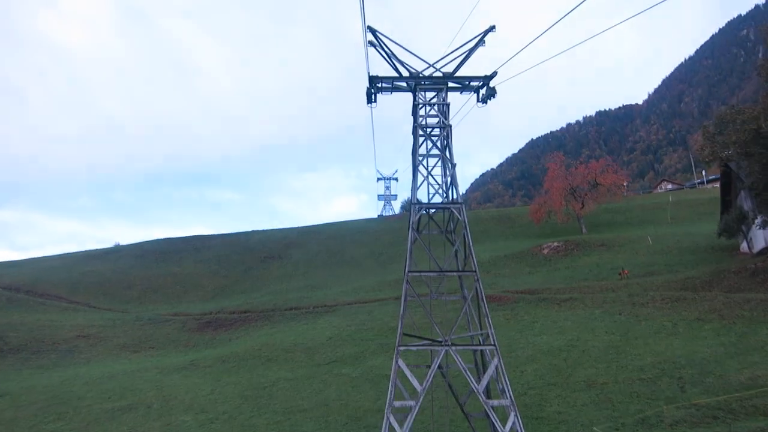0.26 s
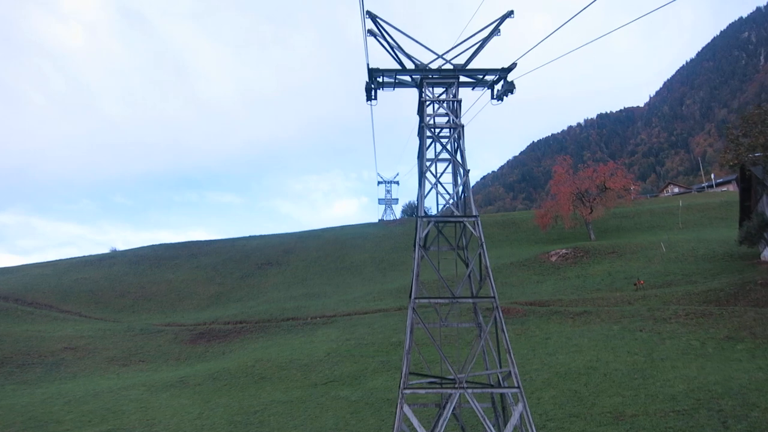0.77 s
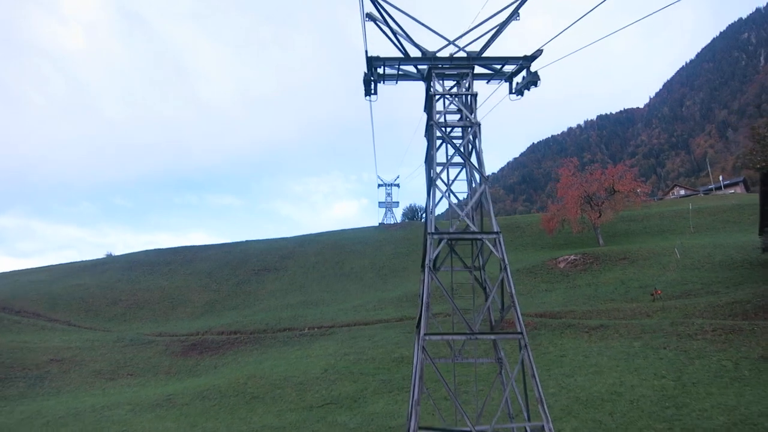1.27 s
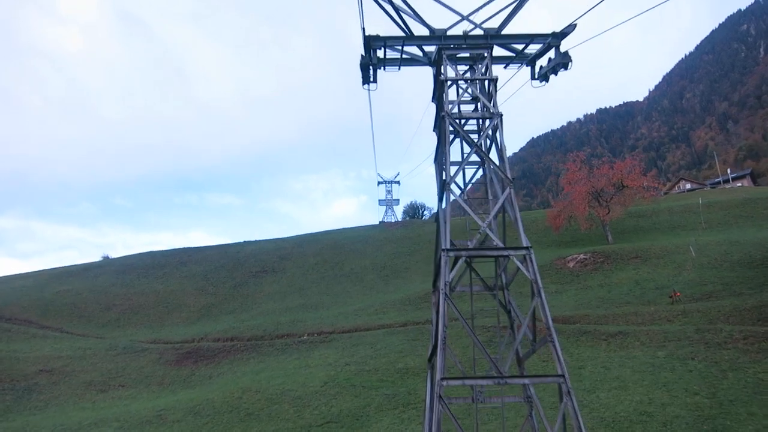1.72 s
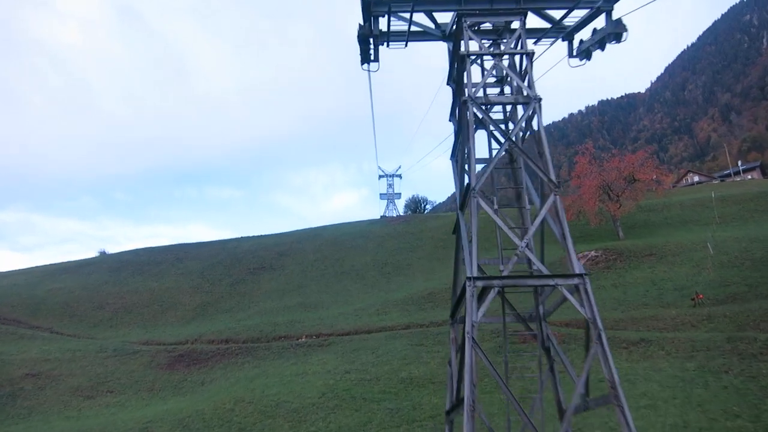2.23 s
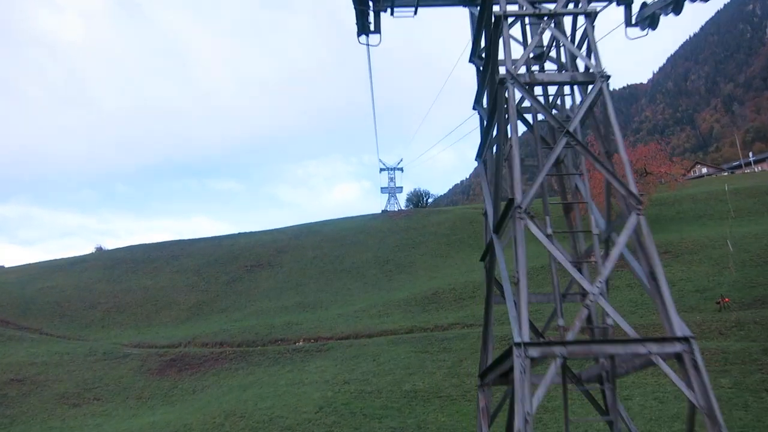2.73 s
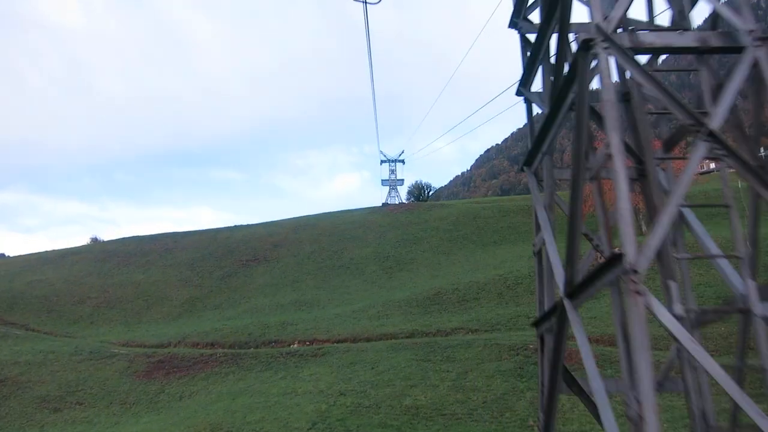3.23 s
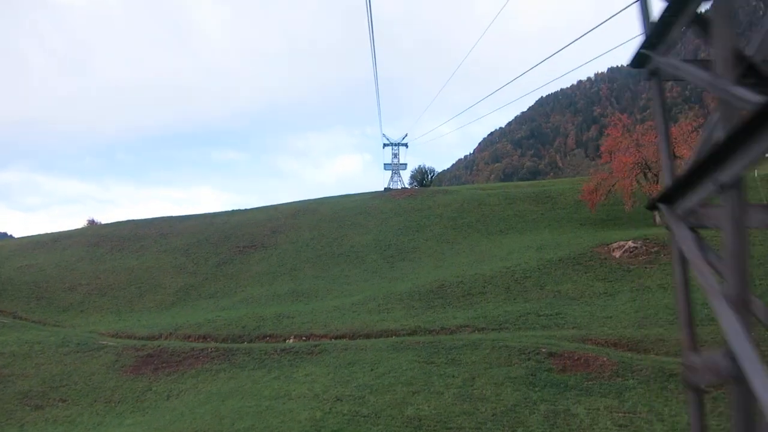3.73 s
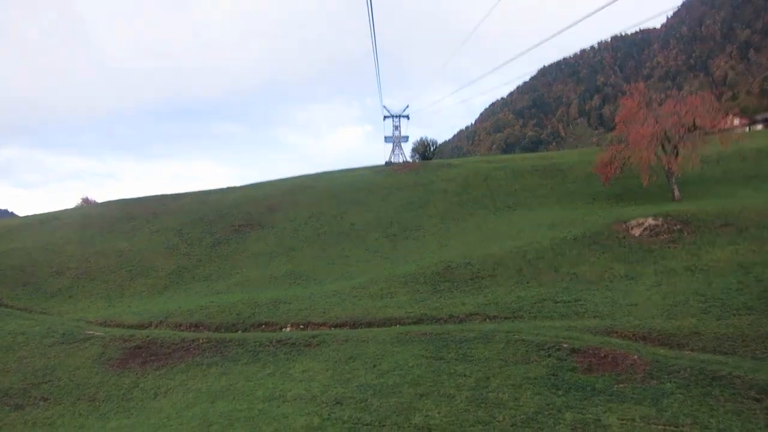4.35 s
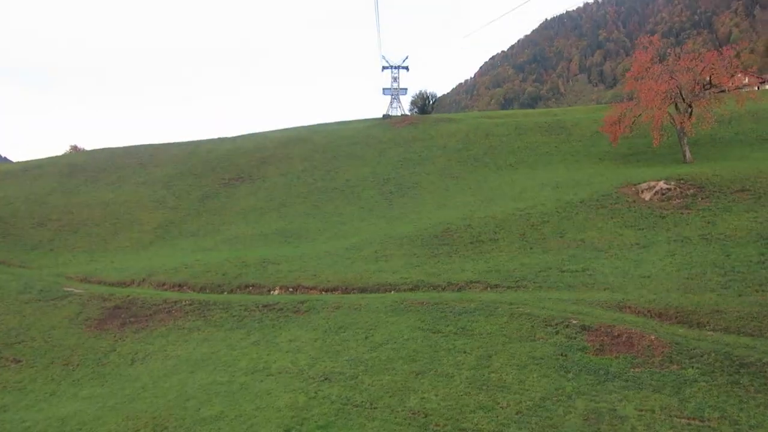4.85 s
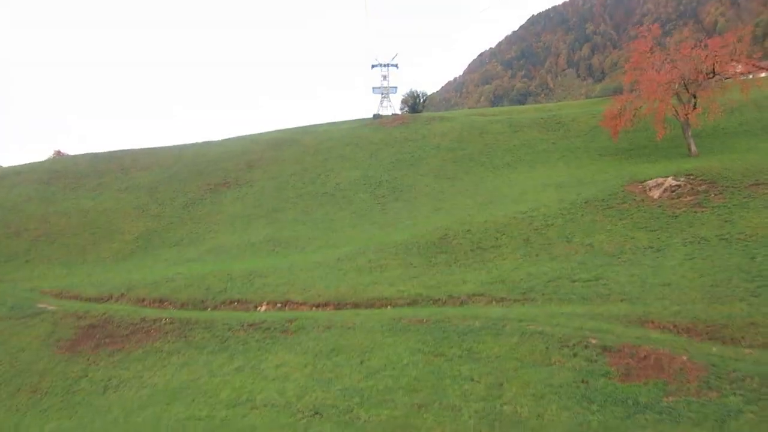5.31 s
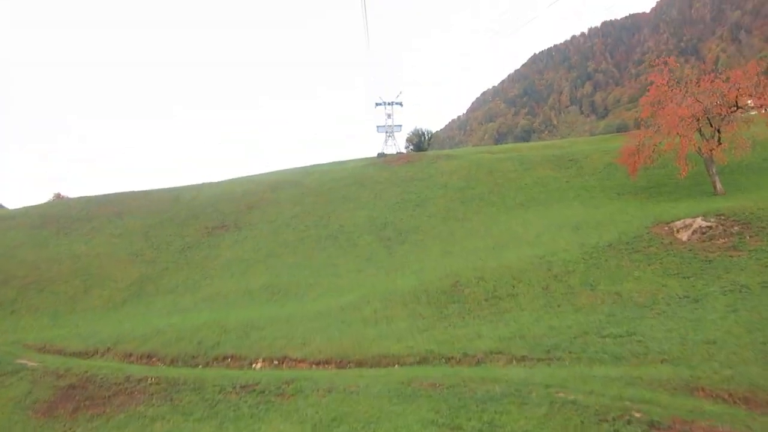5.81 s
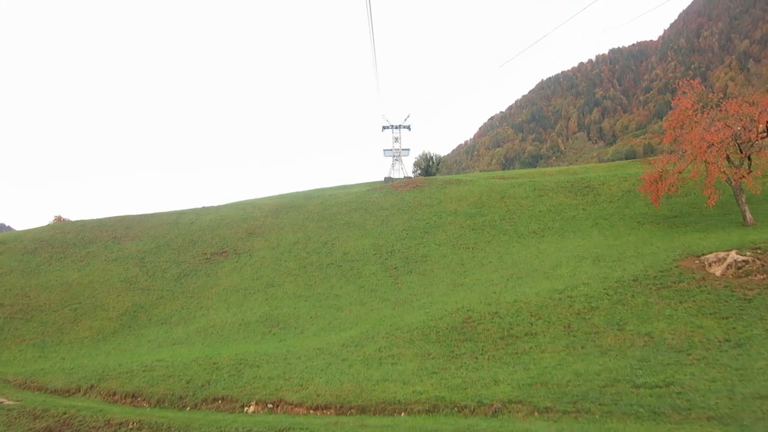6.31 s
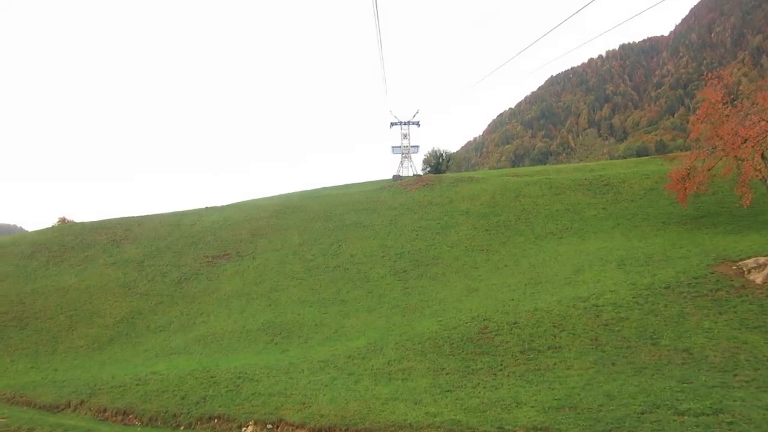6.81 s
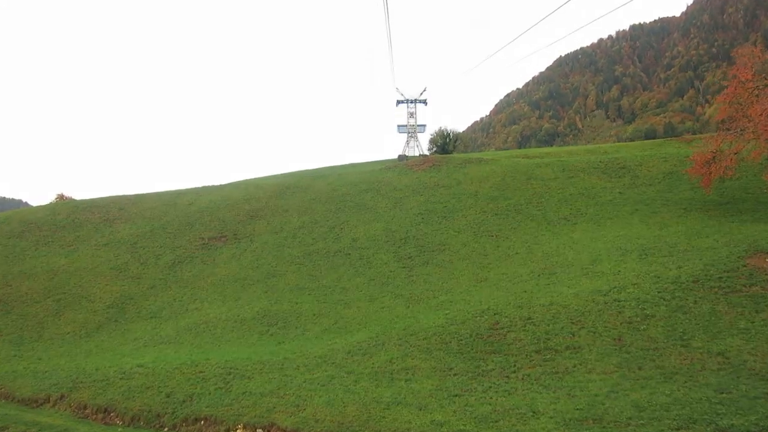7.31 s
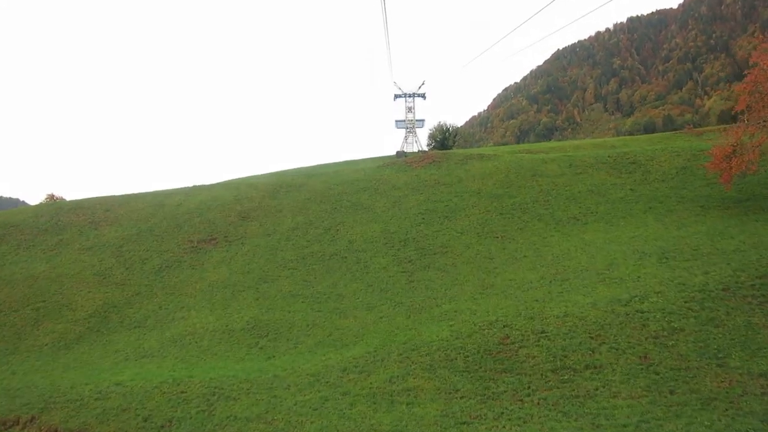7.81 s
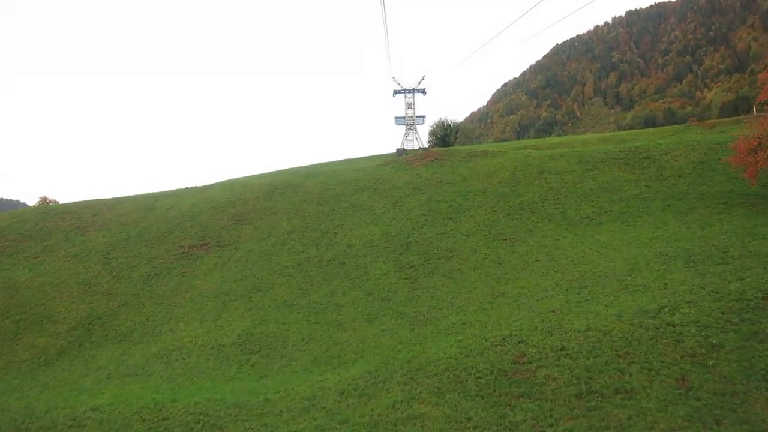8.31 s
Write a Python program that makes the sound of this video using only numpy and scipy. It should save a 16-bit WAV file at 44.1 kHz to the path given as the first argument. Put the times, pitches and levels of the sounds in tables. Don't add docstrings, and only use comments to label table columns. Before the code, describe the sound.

Close stereo sound inside an old aerial cabin: low throbbing rumble from wheels on a rope above, buzzing sheets and panes, bright little rattles. Midway, clustered dull steel clanks and scrapes mark the tower, with barely audible high roller squeaks. The rumble briefly thins before swelling back steadier and less rattly. A few dry plastic snaps jump out very near, and thin air hisses through window gaps.

```python
import sys
import numpy as np
from scipy import signal
from scipy.fft import rfft, irfft, next_fast_len
from scipy.io import wavfile
from scipy.ndimage import uniform_filter1d, map_coordinates

SR = 44100
rng = np.random.default_rng(int(sys.argv[2]) if len(sys.argv) > 2 else 0)


def to_wav(s):
    ch = np.atleast_2d(s).T
    pcm = np.round(np.clip(ch, -1, 1) * 32767)
    wavfile.write(sys.argv[1], SR, pcm.astype(np.int16))


def nominal_scale(level):
    x = np.asarray(level, float) / 20
    return 10 ** x


N = 377937


def rolling():
    phase, load_db, drone_db, jolt_db = wheel_drive()
    extra_db = jolt_db + 46
    return (drone(phase, drone_db) + hull(load_db, drone_db, extra_db) + door(extra_db)
            + rumble(drone_db) + panels(phase, jolt_db) + fittings(phase, load_db, extra_db))


# start_s, strand_rate_hz
ROPE_STRANDS = [(0, 46.86), (4.2, 46.53), (4.7, 44.65), (5.4, 46.65), (6.2, 48.06), (7.2, 48.22),
                (7.6, 46.02), (8.57, 46.8)]
# start_s, level_db
ROPE_LOAD = [(0, 0.5), (2.6, -2.5), (4.3, 0), (4.45, -2.5), (5.2, -7), (5.6, -3), (6.3, -1.5), (7.3, -1.5),
             (8.57, -1.5)]
# peak_s, level_db, rise_s, fall_s
DRONE_SWELLS = [(0.12, -13, 0.1, 0.075), (0.31, -14.5, 0.11, 0.069), (0.483, -10.5, 0.05, 0.13),
                (0.93, -14, 0.19, 0.13), (1.126, -17.5, 0.14, 0.032), (1.287, -11.5, 0.097, 0.15),
                (1.691, -12.5, 0.12, 0.11), (2.076, -11.5, 0.12, 0.12), (2.489, -11.5, 0.13, 0.11),
                (2.91, -10.5, 0.11, 0.081), (3.299, -11.5, 0.13, 0.095), (3.614, -13, 0.029, 0.12),
                (4.029, -18.5, 0.044, 0.273), (4.215, -13, 0.068, 0.062), (4.586, -30, 0.02, 0.2),
                (4.77, -23, 0.02, 0.17), (5.089, -20, 0.1, 0.066), (5.307, -20, 0.126, 0.6),
                (5.715, -14.5, 0.089, 0.11), (6.06, -18.5, 0.11, 0.094), (6.204, -15, 0.21, 0.048),
                (6.384, -11.5, 0.029, 0.12), (6.839, -18, 0.25, 0.048), (6.978, -16, 0.1, 0.057),
                (7.171, -14.5, 0.072, 0.099), (7.493, -14, 0.16, 0.085), (7.794, -14, 0.16, 0.033),
                (7.905, -11.5, 0.091, 0.042), (8.188, -12, 0.13, 0.17), (8.509, -12, 0.072, 0.37)]
# peak_s, level_db, rise_s, fall_s
CABIN_JOLTS = [(.15, -40, 0.093, 0.047), (.299, -48, 0.43, .35), (.503, -40, 0.026, 0.066),
               (.95, -37, 0.096, 0.08), (1.33, -37, 0.11, 0.077), (1.746, -39, 0.11, 0.069),
               (2.139, -36.5, 0.12, 0.073), (2.535, -35.5, 0.11, 0.077), (2.919, -35, 0.082, 0.079),
               (3.337, -36.5, 0.12, 0.086), (3.642, -38.5, 0.04, 0.097), (3.765, -38.5, 0.063, 0.029),
               (4.05, -43.5, 0.12, 0.14), (4.215, -31, 0.08, 0.088), (4.3, -39, 0.062, 0.055),
               (.6, -43, 0.032, 0.035), (1.1, -55, 0.036, 0.11), (1.53, -48.5, 0.023, 0.04),
               (5.27, -46.5, 0.18, 0.17), (5.776, -41.5, 0.17, 0.061), (6.134, -46.5, 0.15, 0.087),
               (6.41, -44.5, 0.065, 0.16), (6.855, -47.5, 0.17, 0.017), (7.207, -47.5, 0.23, 0.019),
               (7.492, -43.5, 0.075, 0.096), (7.674, -43.5, 0.062, 0.047), (7.898, -42.5, 0.12, 0.088),
               (8.198, -42, 0.15, 0.3), (8.535, -40, 0.032, .17)]


def wheel_drive():
    (strand_hz,), (load_db,) = curves(ROPE_STRANDS), curves(ROPE_LOAD)
    drone_db = bumps(DRONE_SWELLS, -32.5)
    jolt_db = bumps(CABIN_JOLTS, -50 + load_db, order=1.5)
    phase = 2 * np.pi * np.cumsum(strand_hz) / SR + 0.039 * wobble(6.0)
    return phase, load_db, drone_db, jolt_db


def drone(phase, drone_db):
    force = np.sqrt(2) * nominal_scale(drone_db + 1.15 * wobble(45))
    octave = 0.32 * force ** 2 * nominal_scale(2.3 * wobble(27)) * np.cos(2 * phase + 0.23)
    return (force * np.sin(phase) + octave) * nominal_scale([[1.2], [-1.2]])


# centre_hz, width_hz, level_db
HULL_MODES = [(95.5, 15, 2), (115.3, 9.5, 1.5), (122.8, 8.3, 2.5), (157.5, 11.7, -6), (187.5, 20.5, -6),
              (245.8, 13.1, -0.5), (273.8, 15.7, -6)]
# frequency_hz, level_db_per_hz
HULL_FLOOR_COLOUR = [(15, -33), (25, -3), (54, 13), (70, -19.5), (288, -56), (325, -20), (355, -20.5),
                     (591, -40), (900, -62), (1170, -74), (1980, -120)]
# peak_s, level_db, half_width_s
ROOF_BEAM_KICKS = [(0.08, -21.5, 0.074), (0.26, -28, 0.032), (0.52, -18.5, 0.044), (0.654, -24, 0.035),
                   (0.91, -23.5, 0.081), (1.25, -20.5, 0.15), (1.55, -21.5, 0.04), (1.81, -21.5, 0.095),
                   (1.93, -20, 0.042), (2.09, -18.5, 0.04), (2.25, -21, 0.05), (2.43, -27, 0.04),
                   (2.54, -20, 0.078), (2.68, -23, 0.04), (2.81, -27, 0.036), (3.1, -18.5, 0.09),
                   (3.28, -22, 0.08), (3.47, -22.5, 0.063), (3.64, -22, 0.082), (3.89, -22, 0.056),
                   (3.99, -19, 0.036), (4.22, -21, 0.07), (4.44, -33, 0.031), (4.53, -30, 0.027),
                   (4.69, -26, 0.046), (4.86, -27.5, 0.077), (5.01, -33, 0.032), (5.26, -25, 0.11),
                   (5.79, -21.5, 0.032), (5.92, -24.5, 0.031), (6.04, -21, 0.077), (6.35, -18, 0.051),
                   (6.43, -20, 0.075), (6.56, -23.5, 0.048), (6.72, -27, 0.048), (6.89, -22, 0.074),
                   (7.19, -20.5, 0.12), (7.4, -26, 0.036), (7.5, -17.5, 0.04), (7.66, -17, 0.06),
                   (7.87, -19.5, 0.06), (8.11, -17, 0.095), (8.53, -25, 0.031)]
# peak_s, level_db, half_width_s
FLOOR_SHEET_KICKS = [(.14, -20, 0.066), (.34, -22.5, 0.021), (.49, -25, 0.053), (.68, -26.5, 0.031),
                     (.93, -24, 0.17), (1.3, -22, 0.12), (1.54, -25, 0.018), (1.709, -23, 0.095),
                     (2.1, -24.5, 0.16), (2.23, -26, 0.027), (2.52, -23, 0.13), (2.92, -22.5, 0.13),
                     (3.3, -23.5, 0.14), (3.66, -25.5, 0.042), (3.78, -22.5, 0.081), (4.07, -27, 0.13),
                     (4.22, -21, 0.11), (4.62, -34, .05), (4.9, -31, 0.032), (5.3, -31.5, 0.084),
                     (5.68, -28, 0.048), (5.8, -26, 0.078), (6.19, -27, 0.09), (6.4, -22, 0.042),
                     (6.7, -27, 0.041), (6.88, -29, 0.038), (7.15, -24.5, 0.11), (7.5, -22, 0.14),
                     (7.71, -23, 0.13), (7.92, -27, 0.12), (8.2, -19.5, 0.088), (8.5, -26, 0.097)]


def hull(load_db, drone_db, extra_db):
    beam_hz, floor_hz = 105.9, 140

    def body(f):
        select = 1 / (1 + (f / 340) ** 4)
        return select * np.abs(modes(HULL_MODES, f)) + nominal_scale(along(HULL_FLOOR_COLOUR, f) - 11.5) * (f > 55)

    shell = steady(pair(lambda f: body(f) * (f < beam_hz)), 0.28, 0.045)
    beam = steady(pair(lambda f: body(f) * (f >= beam_hz) * (f < floor_hz)), 0.51, 0.04)
    floor = steady(pair(lambda f: body(f) * (f >= floor_hz)), 0.81, 0.049)
    shell_db = -18.5 + 0.17 * extra_db + 0.13 * (drone_db + 17) + 0.88 * load_db
    beam_db = bumps([(s, db, w, w) for s, db, w in ROOF_BEAM_KICKS], -28 + load_db)
    floor_db = bumps([(s, db, w, w) for s, db, w in FLOOR_SHEET_KICKS], -27.5 + 1.07 * load_db)
    return nominal_scale(shell_db - 4.5) * shell + nominal_scale(beam_db - 0.5) * beam + nominal_scale(floor_db) * floor


# peak_s, level_db
DOOR_HUMS = [(.15, -29), (.94, -31), (2.14, -25), (2.55, -22.5), (2.93, -23), (3.34, -26), (3.74, -30.5),
             (4.22, -23.5), (5.73, -32), (6.12, -29.5), (7.5, -34), (8.2, -44)]


def door(extra_db):
    rise_s, fall_s = 0.042, 0.067
    hum = steady(pair(lambda f: modes([(323.5, 18.2, 0)], f) ** 2), 0.71, 0.023)
    door_db = bumps([(s, db, rise_s, fall_s) for s, db in DOOR_HUMS], -38.5 + 0.58 * extra_db)
    return nominal_scale(door_db - 3.0) * hum


def rumble(drone_db):
    colour = [(20, -34), (33, -17), (60, -10.0), (80, -43)]  # frequency_hz, level_db_per_hz
    return nominal_scale(drone_db - 12.5) * pair(lambda f: nominal_scale(along(colour, f)) * (f < 90))


# centre_hz, width_hz, lift_db
PANEL_MODES = [(512, 25, 4.5), (677, 23, 3.5), (752, 103, -9), (730, 11, 6.5), (785, 14, 2.5),
               (1693, 25, 2), (2160, 16, -3), (905, 8.2, 9), (1085, 20, 5), (1198, 31, 5), (1553, 88, 4.5),
               (2068, 13, 8.5), (2763, 40, 6)]
# frequency_hz, level_db_per_hz
PANEL_NOISE = [(300, -3), (400, -4), (560, -8.5), (750, -4), (1220, -11), (1400, -15.5), (1600, -15.5),
               (2000, -20), (2500, -25), (2900, -28.5), (3300, -36), (4200, -37.5), (6000, -94)]


def panels(phase, jolt_db):
    def colour(f):
        lift_db = sum(db / (1 + ((f - c) / w * 2) ** 2) for c, w, db in PANEL_MODES)
        return nominal_scale(along(PANEL_NOISE, f) + lift_db)

    thin = lambda f: 1 / (1 + (950 / (f + 1)) ** 6)
    panel_db = jolt_db + 5.5 + 0.86
    uneven = nominal_scale(2.2 * wobble(25) + 1.7 * wobble(300))
    sheets = pair(lambda f: colour(f) * (1 - thin(f)), nominal_scale(0.54 * wobble(25)))
    panes = pair(lambda f: colour(f) * thin(f), uneven * contact(phase, 0.05, 8.5))
    sheets, panes = steady(sheets, 0.45, 0.046), steady(panes, 0.34, 0.028)
    return nominal_scale(0.65 * panel_db - 9.0) * sheets + nominal_scale(1.1636 * panel_db + 2.5) * panes


# frequency_hz, level_db_per_hz
FITTING_HISS = [(2400, -19), (3200, 1), (3900, -6.5), (4650, -1), (5500, -4), (6000, -2.5), (7200, -3.5),
                (7700, -6), (8300, -2.5), (9600, -12), (11000, -8), (11900, -11), (13000, -15),
                (15700, -29)]


def fittings(phase, load_db, extra_db):
    chatter = nominal_scale(2.3 * wobble(35) + 1.6 * wobble(600)) * contact(phase, 0.11, -1.5)
    fitting_db = -56.5 + 0.91 * extra_db + 0.77 * load_db
    return nominal_scale(fitting_db - 2.0) * pair(lambda f: nominal_scale(along(FITTING_HISS, f)), chatter)


def contact(phase, depth, lag):
    return np.exp(depth * np.cos(phase + lag))


# start_s, level_db, scrape_db
SHOE_BLOWS = [(3.722, -21, -1), (3.745, -28, -7), (3.815, -27.5, 3), (3.879, -30, 5.5), (3.968, -34, 8),
              (4.101, -6, -14), (4.192, -11, -14), (4.208, -13, -8), (4.254, -25, -5.5), (4.228, -34, -6),
              (4.402, -34.5, 7.5), (4.426, -33, -1), (4.534, -14, -17.5), (4.609, -12, -15),
              (4.823, -12, -20), (5.194, -6.5, -18), (5.283, -38, -2)]
# pitch_hz, level_db, t60_s
HANGER_MODES = [(682, -9, 0.15), (722, -2, .09), (791, 0, 0.085), (868, -6, .06), (409, -16, .2),
                (1010, -19, .2), (1095, -14, .09), (735, 0, 0.1), (890, -7, 0.3), (395, -14, .2),
                (1104, -16, .25)]
# start_s, level_db
ARM_SLIDES = [
    (3.893, -22.5),
    (3.985, -24),
    (4.664, -23),
    (4.685, -20.5),
]
# pitch_hz, level_db, t60_s
GRAZED_MODES = [(678, 0, .14), (1010, -9, .1), (409, -12, .2), (1346, -15, .1)]
# centre_hz, width_hz, level_db
SCRAPE_MODES = [(734, 185, 9), (1156, 70, 4), (1450, 570, -3.5), (1960, 550, 1), (2190, 610, -2.5)]
# start_s, pitch_hz, level_db, t60_s
WHEEL_THUDS = [(3.634, 170, 5, .04), (3.3, 270, -12, 0.066), (3.63, 680, -20, .06), (3.722, 510, -17, 0.11),
               (4.207, 258, -1, 0.069), (3.79, 434, -21.5, 0.084), (3.99, 273, -9, 0.063)]


def clanks():
    out, scrape, t = np.zeros(N), np.zeros(N), np.arange(SR // 3) / SR
    rise = (1 - np.exp(-t / 0.0032)) ** 2
    rebound_s = .014

    def partial(hz, db, t60):
        blur = np.cumsum(rng.normal(0, .019, len(t)))
        return nominal_scale(db - 60 * t / t60) * np.sin(2 * np.pi * hz * t + blur)

    ring = lambda table: rise * sum(partial(*row) for row in table)
    for s, db, scrape_db in SHOE_BLOWS:
        select = 4 < s < 4.15 or 4.2 < s < 4.3
        struck = HANGER_MODES[7:] if select else HANGER_MODES[:7]
        add(out, s - .005, nominal_scale(db - 6.0) * ring(struck))
        add(out, s - .005 + rebound_s, nominal_scale(db - 10.0) * ring(struck))
        add(scrape, s - .004, nominal_scale(db + scrape_db) * rise * nominal_scale(-60 * t / 0.15))
    for s, db in ARM_SLIDES:
        add(out, s - .005, nominal_scale(db) * ring(GRAZED_MODES))
    for s, hz, db, t60 in WHEEL_THUDS:
        add(out, s, ring([(hz, db, t60)]))
    out += scrape * unit(filtered(rng.standard_normal(N), lambda f: modes(SCRAPE_MODES, f)))
    return filtered(out, lambda f: 1 / (1 + (f / 2700) ** 8))


# start_s, level_db, push_hz, tick_db
PLASTIC_CRACKS = [(2.3556, -12.5, 1480, -38), (3.0426, -16, 1350, -33), (5.132, -17, 1200, -30),
                  (5.145, -15.5, 906, -35), (5.166, -18, 1593, -21), (5.184, -21, 900, -21),
                  (6.4591, -5.5, 1510, -11.5), (6.524, -13, 1450, -18), (6.5663, -9, 1420, -12.5),
                  (6.934, -30, 1100, -32)]
# frequency_hz, level_db_per_hz
TICK_COLOUR = [(1500, -7), (2500, -13), (4800, -2), (6800, -5), (9000, 0), (13000, -6), (15800, -29)]
# centre_hz, width_hz
HOUSING_DIPS = [(3300, 540), (4900, 600), (7400, 500)]
# start_s, pitch_hz, level_db
STEEL_PINGS = [(3.4822, 11500, -31), (5.147, 11500, -50), (5.185, 12800, -42), (5.199, 12200, -52),
               (5.204, 12860, -47), (5.2215, 11200, -43), (5.2835, 10700, -54)]


def snaps():
    out, t = np.zeros((2, N)), np.arange(SR // 30) / SR
    lean = nominal_scale([[1.8], [-1.8]])
    late = np.maximum(t - np.array([[0], [.0001]]), 0)
    soften = lambda f: 1 / (1 - (f / 2200) ** 2 + .9j * f / 2200) ** 2
    edge = nominal_scale(-60 * t / 0.00045) * np.array([[1.3], [.4]])
    edge = edge + nominal_scale(-60 * t / 0.003) * np.sin(2 * np.pi * 7000 * t) * np.array([[.22], [.5]])
    body = 0.1 * np.sin(2 * np.pi * 620 * t) * nominal_scale(-60 * t / 0.0055)
    for s, db, push_hz, tick_db in PLASTIC_CRACKS:
        hiss = rng.standard_normal((2, len(t)))
        push = 1.08 * filtered(np.sin(2 * np.pi * push_hz * late) * nominal_scale(-60 * late / 0.0017), soften)
        bright = unit(filtered(hiss[0] + 0.23 * hiss, lambda f: nominal_scale(along(TICK_COLOUR, f))))
        tick = nominal_scale(tick_db) * bright * (nominal_scale(-60 * t / 0.0054) + 0.1 * nominal_scale(-60 * t / 0.051))
        dull = uniform_filter1d(uniform_filter1d(hiss[0], size=11), size=7)
        shiver = 0.33 * dull * nominal_scale(-60 * t / 0.042)
        add(out, s, nominal_scale(db) * lean * (push + shiver + body))
        add(out, s + .0003, nominal_scale(db + 1.5) * (.55 * lean * tick + nominal_scale(tick_db + 7.5) * edge))
    out = filtered(out, lambda f: 1 - sum(0.44 / (1 + 2j * (f - hz) / width) for hz, width in HOUSING_DIPS))
    for s, hz, db in STEEL_PINGS:
        swell = np.exp(-(t / 0.00028 - 1.5) ** 2) + 0.1 * nominal_scale(-60 * t / 0.015)
        add(out, s, nominal_scale(db) * np.sin(2 * np.pi * hz * t) * swell)
    return out


# start_s, level_db, top_db
FITTING_STRIKES = [(0.056, -30.5, -5), (0.121, -34.5, -6), (0.2683, -39, -7), (0.304, -38, -7),
                   (0.3311, -35, -9), (0.502, -33, -7), (0.591, -38, -10), (0.777, -36.5, -7),
                   (0.862, -34, -12), (0.926, -32, -3), (1.1545, -36, -10), (1.22, -35, -8),
                   (1.3004, -36, -10), (1.514, -33, -6), (1.7783, -34, -8), (1.983, -37.5, -9),
                   (2.0722, -34, -11), (2.3565, -43, 0), (2.4349, -38, -11), (2.496, -32, -7),
                   (2.844, -32.5, -7), (3.04, -44, 1), (3.1782, -38.5, -9), (3.243, -47, -2),
                   (0.684, -40.5, -10), (1.371, -48, -14), (1.687, -42, -9), (1.711, -40, -9),
                   (1.898, -43, -7), (2.1136, -45, -9), (2.1814, -43, -11), (2.4553, -45, -11),
                   (2.905, -39, -1), (3.27, -33, -10), (.482, -48, -9), (.53, -53, -11), (.615, -59, 0),
                   (.715, -44, -11), (.75, -48, -9), (.845, -45, -9), (1.48, -44, -12),
                   (3.4815, -44, 3), (3.5857, -38.5, -14), (3.629, -27.5, -4.5), (3.714, -33.5, -12),
                (4.0797, -30, -4), (4.514, -40, -11), (4.603, -41, -13), (5.711, -36.5, -13),
                (6.0905, -40, -17), (6.674, -43, -16), (6.763, -46, -15), (6.786, -40, -12),
                (6.968, -45, -14), (7.081, -40, -14), (7.1642, -37, -14), (7.3912, -41, -11),
                (7.461, -34, -3), (7.5085, -38.5, -1), (7.6432, -29.5, -12), (7.818, -40, -19),
                (7.9073, -39, -11), (8.203, -29, -10), (8.2671, -37, -15), (8.381, -42, -13),
                (8.4121, -37, -20), (8.499, -33, -10), (4.484, -50, -12), (4.78, -45, -12),
                (5.271, -39, -8), (5.312, -45, -12), (5.65, -48, -12), (5.69, -38, -13), (5.777, -55, -12),
                (5.797, -44, -12), (6.383, -39, -8), (7.191, -52, -12), (7.791, -38, -14),
                (8.227, -56, -12), (8.482, -48, -12), (8.138, -43, -14), (7.524, -42, -11)]
# pitch_hz, level_db, t60_s, delay_s
WASHER_CLICKS = [
    (4700, -6, .018, .001),
    (2750, -4, .02, .007),
    (4750, -12, .015, .024),
    (2760, -8, .02, .031),
]
# centre_hz, width_hz, level_db
FITTING_BUZZ = [(2690, 410, 5), (3260, 52, -13), (4750, 190, -7), (6040, 250, -6)]


def rattles():
    low, top, clicks, t = np.zeros(N), np.zeros(N), np.zeros(N), np.arange(SR // 6) / SR
    fall = 0.5 * nominal_scale(-60 * t / 0.02) + 1.45 * (1 - np.exp(-t / 0.0021)) * nominal_scale(-60 * t / 0.16)
    for s, db, top_db in FITTING_STRIKES:
        add(low, s + 0.00046, nominal_scale(db - 14.5) * fall)
        add(top, s + 0.00041, nominal_scale(db + top_db - 17.0) * fall)
        for hz, level_db, t60, delay in WASHER_CLICKS:
            tone = np.sin(2 * np.pi * hz * rng.normal(1, 0.012) * t)
            ring = tone * nominal_scale(-60 * t / t60) * (1 - np.exp(-t / 0.00072))
            add(clicks, s + delay, nominal_scale(db + level_db + rng.normal(0, 1.5)) * ring)
    colour = lambda f: nominal_scale(along(FITTING_HISS, f))
    low_hiss = pair(lambda f: colour(f) * (f < 9400) + 0.5 * np.abs(modes(FITTING_BUZZ, f)) ** 2)
    top_hiss = pair(lambda f: colour(f) * (f > 9400))
    return clicks + low * low_hiss + top * top_hiss


# middle_s, half_length_s, top_hz, level_db, bend (0-1)
ROLLER_SQUEAKS = [(4.34, 0.039, 13300, -64, .08), (4.345, .04, 9000, -66, .08),
                  (4.477, .03, 12450, -59, .08), (4.475, .03, 8850, -72, .08),
                  (6.84, .035, 10750, -72, .01), (6.9, .025, 11800, -73, .02),
                  (6.925, .035, 12850, -73, .01), (7.026, .03, 10800, -72, .01),
                  (7.23, .04, 9200, -67, .02)]


def squeaks():
    out = np.zeros(N)
    for s, half, top_hz, db, bend in ROLLER_SQUEAKS:
        u = np.linspace(-1, 1, round(2 * half * SR))
        glide = 2 * np.pi * np.cumsum(top_hz * (1 - bend * u ** 2)) / SR
        add(out, s - half, nominal_scale(db) * (1 - u ** 2) * np.sin(glide))
    return out


# frequency_hz, t60_s
CABIN_DECAY = [(300, 0.19), (800, 0.13), (2000, 0.56), (10000, 0.05)]


def cabin(x):
    hz, t, z = signal.stft(rng.standard_normal((2, SR // 3)), SR, nperseg=256)
    fading = z * nominal_scale(-60 * t / along(CABIN_DECAY, hz)[:, None])
    tail = signal.istft(fading, SR, nperseg=256)[1]
    late = np.pad(x, (130, 0))[None]
    return signal.fftconvolve(late, tail / np.linalg.norm(tail[0]), axes=1)[:, :N]


# frequency_hz, level_db_per_hz
WIND_COLOUR = [(2500, -34), (3500, -9), (4250, -6), (4550, -5), (4800, -1), (5500, -11), (6300, -2),
               (6900, 4), (8500, -1.5), (9800, -9), (11500, -5), (13300, -10), (15700, -11)]
# centre_hz, width_hz, level_db
GAP_WHISTLE = [(4540, 82, 3.5), (6160, 70, 2)]


def air():
    hiss = pair(lambda f: nominal_scale(along(WIND_COLOUR, f)) + 0.97 * np.abs(modes(GAP_WHISTLE, f)) ** 2)
    return nominal_scale(-62.0 + 0.64 * wobble(0.16)) * hiss


# frequency_hz, likeness (-1 to 1)
PORT_LIKENESS = [(60, 0.91), (180, 1), (300, 0.94), (600, 0.72), (1500, 0.64), (3400, 0.54), (4200, 0.89),
                 (6500, 0.99), (8300, 0.92), (10000, 0.39), (13000, 0.64), (15500, -0.7)]
# frequency_hz, level_db
PORT_LEAN = [(60, 4), (125, 0.7), (300, -2), (520, 2.5), (1000, 0), (2200, 1.5), (4000, 0), (9000, 0.5),
             (11500, 1.5), (15000, 1)]


def pair(gain, chatter=1):
    m = next_fast_len(N + 8192)
    hz = np.fft.rfftfreq(m, 1 / SR)
    turn = np.arccos(np.clip(along(PORT_LIKENESS, hz), -1, 1)) / 2
    noise = rfft(chatter * rng.standard_normal((2, N)), m)
    mid, side = noise * gain(hz) * [np.cos(turn), np.sin(turn)]
    tilt = nominal_scale(along(PORT_LEAN, hz) * [[.5], [-.5]])
    return unit(irfft([mid + side, mid - side] * tilt, m)[:, :N])


def steady(x, share, hold_s):
    size = round(hold_s * SR)
    power = uniform_filter1d(np.mean(x ** 2, 0), size=size)
    level = np.abs(uniform_filter1d(power, size=size))
    return unit(x / (level + 0.079) ** (share / 2))


def bumps(rows, rest_db, order=2):
    step = 64
    t = np.arange(0, N + step, step) / SR
    s, db, rise, fall = np.transpose(rows)[:, :, None]
    distance = np.abs((t - s) / np.where(t < s, rise, fall))
    power = (nominal_scale(db) * np.exp(-distance ** order)) ** 2
    return 10 * np.log10(np.interp(np.arange(N) / SR, t, power.sum(0)) + nominal_scale(rest_db) ** 2)


def modes(table, f):
    return sum((-1) ** k * nominal_scale(db) * 1j * f * w / (c * c - f * f + 1j * f * w)
               for k, (c, w, db) in enumerate(table))


def filtered(x, response):
    m = next_fast_len(x.shape[-1] + 8192)
    return irfft(rfft(x, m) * response(np.fft.rfftfreq(m, 1 / SR)), m)[..., :x.shape[-1]]


def along(points, hz):
    f, v = np.transpose(points)
    return np.interp(np.log(hz + 1), np.log(f + 1), v)


def curves(rows):
    s, *cols = np.transpose(rows)
    return [np.interp(np.arange(N) / SR, s, c) for c in cols]


def wobble(rate):
    return map_coordinates(rng.standard_normal(int(N * rate / SR) + 4), [np.arange(N) * rate / SR])


def unit(x):
    return x / np.sqrt(np.mean(x ** 2) + 1e-20)


def add(track, s, sound):
    part = track[..., round(s * SR):][..., :sound.shape[-1]]
    part += sound[..., :part.shape[-1]]


def scene():
    steel, cracks = clanks(), snaps()
    direct = rolling() + steel * nominal_scale([[.7], [-.7]]) + cracks + rattles() + squeaks() + air()
    return direct + nominal_scale(-10.0) * cabin(steel) + nominal_scale(-27) * cabin(cracks.mean(0))


def band_limit(x):
    return signal.sosfilt(signal.butter(12, 15800, fs=SR, output="sos"), x)


def record(dry):
    clipped = dry / (1 + np.abs(dry / 1.25) ** 8) ** (1 / 8)
    mix = filtered(clipped, lambda hz: hz < 15800)
    return band_limit(mix)


dry = scene()
out = record(dry)
to_wav(out)
```